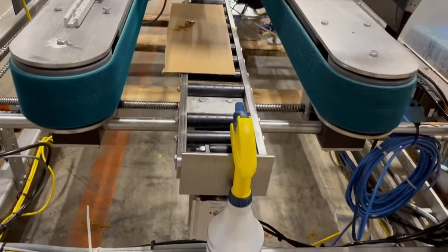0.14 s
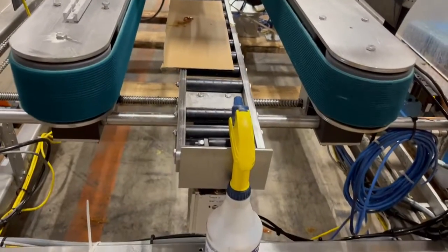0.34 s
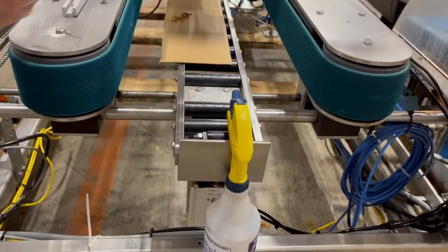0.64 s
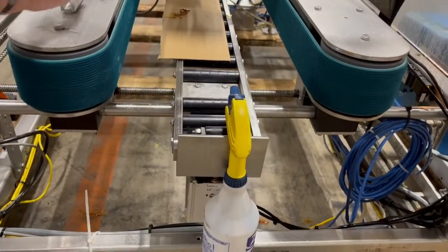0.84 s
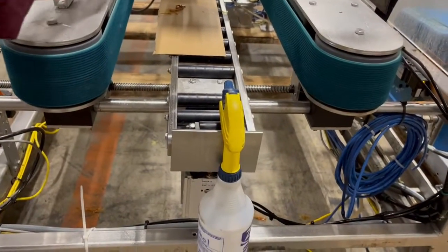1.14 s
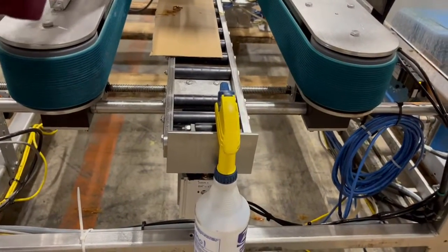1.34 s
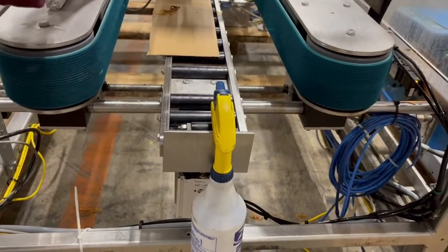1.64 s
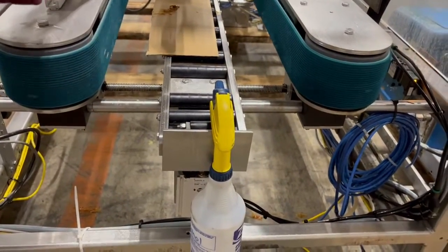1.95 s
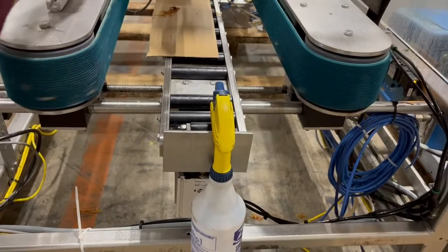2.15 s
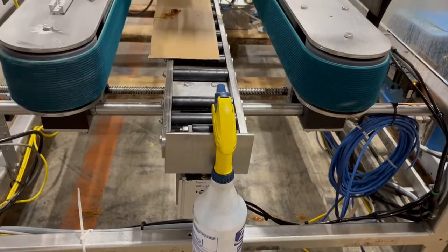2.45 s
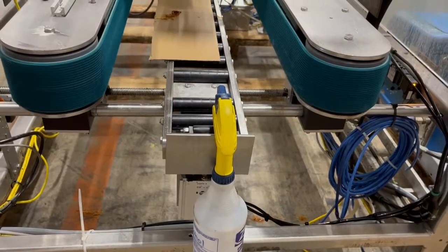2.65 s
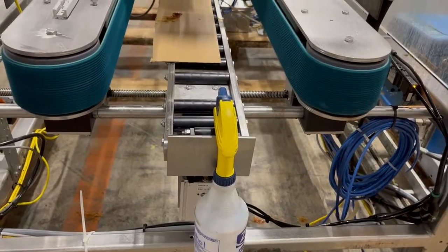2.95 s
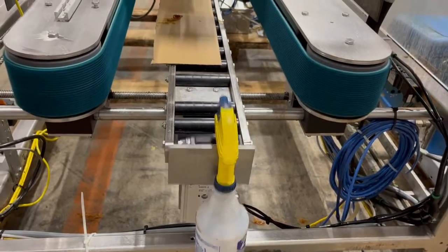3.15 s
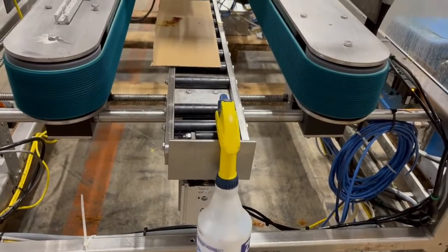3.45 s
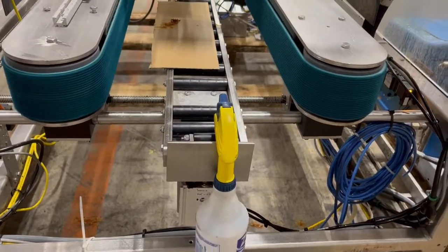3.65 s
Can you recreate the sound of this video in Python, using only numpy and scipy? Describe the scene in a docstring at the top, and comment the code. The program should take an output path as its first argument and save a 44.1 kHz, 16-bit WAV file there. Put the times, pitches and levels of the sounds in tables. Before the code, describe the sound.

A case sealer runs empty up close, with a steady belt whir, fast low throb, wavering gear hum and thin air hiss over factory rumble. The hum swells near 1.1 s. At 1.6 s small clacks and an air burst begin a juddering, scraping metallic rattle, strongest until 2.2 s, thinning to 2.8 s. From 3.1 to 3.4 s, air puffs and sharp steel clacks; then the whir continues, with a faint tick near 3.6 s.

```python
"""A case sealer runs empty in a factory, close by: shaft throb, gear tones, belt noise ringing bearings, a leak's hiss.
The main gear hum, a wavering sine, swells near 1.1 s; from 1.6 s two small clacks and bursts of exhaust noise.
The side-belt carriage then judders (a gliding tone), scrapes and rattles (noise bursts ringing frame modes).
Past 3 s more air flows and steel parts clack home: sagging thuds, struck modes and bright noise.
Low rumble lies under it all; a short diffuse tail follows the hits."""
import sys
import numpy as np
from scipy import signal
from scipy.fft import rfft, irfft
from scipy.io import wavfile
from scipy.ndimage import uniform_filter1d

SR = 44100
rng = np.random.default_rng(int(sys.argv[2]) if len(sys.argv) > 2 else 0)


def bounce(signal):
    """Save signal as a 16-bit WAV file at the path given by the first command-line argument."""
    frames = np.transpose(np.atleast_2d(signal))
    limited = np.clip(frames, -1, 1)
    pcm = np.round(limited * 32767).astype(np.int16)
    wavfile.write(sys.argv[1], SR, pcm)


N = 166698
T = np.arange(N) / SR
FREQS = np.arange(N // 2 + 1) * SR / N


def undb(db):
    """Decibels to gain."""
    return 10 ** (np.asarray(db) / 20)


def unit(x):
    """Scale to rms 1."""
    return x / np.sqrt(np.mean(x ** 2))


def over_hz(points):
    """Join (frequency [Hz], value) points on a log-frequency axis."""
    hz, value = np.array(points).T
    return np.interp(np.log(FREQS + 1), np.log(hz), value)


def over_time(points):
    """Join (time [s], value) points linearly."""
    time_s, value = np.array(points).T
    return np.interp(T, time_s, value)


def walk(rate_hz):
    """Smooth random wander of rms 1: noise under a Gaussian low-pass."""
    spectrum = rfft(rng.standard_normal(N))
    return unit(irfft(spectrum * np.exp(-(FREQS / rate_hz) ** 2), N))


def envelope(start_s, attack_s, hold_s, decay_s):
    """Linear rise, hold, exponential fall with time constant decay_s."""
    age = T - start_s
    fall = np.exp(-np.clip((age - attack_s - hold_s) / decay_s, 0, 20))
    return np.clip(age / attack_s, 0, 1) * fall


def tone(hz):
    """A sine of rms 1 that follows a pitch curve from a random phase."""
    cycles = np.cumsum(hz) / SR + rng.random()
    return np.sqrt(2) * np.sin(2 * np.pi * cycles)


RIPPLE_WIDTH_HZ = 34.7


def ripple(db):
    """Fine peaks and dips that reflections off nearby steel leave in a spectrum."""
    size = max(int(RIPPLE_WIDTH_HZ * N / SR), 1)
    smooth = uniform_filter1d(rng.standard_normal(len(FREQS)), size)
    return undb(db * unit(uniform_filter1d(smooth, size)))


# likeness of noise at the two ports: (frequency [Hz], likeness [0-1])
PORT_LIKENESS = [(60, 0.5), (130, 1), (290, 0.55), (640, 0.63), (1400, 0.27), (3100, 0.69), (6000, 0.05),
                 (7200, 0.8), (8000, 1), (10000, 1), (15000, 1)]


def noise(spectrum, ripple_db=0):
    """Coloured noise of rms 1 at two ports: a shared part plus an opposed part."""
    mid, side = rfft(rng.standard_normal((2, N)))
    alike = np.clip(over_hz(PORT_LIKENESS), 0, 1)
    shared = mid * np.sqrt(1 + alike)
    opposed = np.array([[1], [-1]]) * side * np.sqrt(1 - alike)
    return unit(irfft((shared + opposed) * undb(over_hz(spectrum)) * ripple(ripple_db), N))


def damped_modes(modes, t, pitch=1):
    """Sum of decaying sines, as steel rings after one impulse."""
    return sum(undb(db - 60 * t / t60_s) * np.sin(2 * np.pi * hz * pitch * t)
               for hz, db, t60_s in modes)


def ring(x, modes, db):
    """Steel modes driven by x, at a level db relative to it."""
    response = damped_modes(modes, T[:SR // 2])
    ringing = signal.fftconvolve(x, response[None], axes=1)[:, :N]
    return unit(ringing) * x.std() * undb(db)


SHAFT_HZ, SHAFT_WANDER_RATIO = 19.33, 0.0023
SHAFT_DB, SHAFT_FLICKER_DB = -39.5, 1.56
SHAFT_BEAT_S, SHAFT_SMEAR_RAD = 0.032, 1.15
# shaft harmonics: (multiple of shaft rate, relative level [dB])
SHAFT_HARMONICS = [(3, -0.5), (4, -2), (5, -13.5), (6, -1.5), (7, -2.5), (8, -11), (9, -12.5), (10, -5.5),
                   (11, -15), (16, -24), (20, -16)]


def shaft(turn):
    """Shaft harmonics, loosely aligned in phase, throb once a turn."""
    throb = 0
    for k, db in SHAFT_HARMONICS:
        level = undb(db + SHAFT_FLICKER_DB * walk(3.2))
        throb = throb + level * np.cos(k * turn + SHAFT_SMEAR_RAD * rng.standard_normal())
    return undb(SHAFT_DB) * unit(throb)


GEAR_WANDER_RATIO, GEAR_FLICKER_DB = 0.007, 3
# motor, gear and roller tones: (frequency [Hz], level [dB])
GEAR_TONES = [(61.7, -50.5), (305, -62), (415, -60.5), (504, -61.5), (533, -63.5), (592, -57.5), (652, -66),
              (711, -60.5), (1160, -62), (1244, -53)]


def gears():
    """Motor, gears and rollers hum as sines wavering in pitch and level."""
    return sum(undb(db + GEAR_FLICKER_DB * walk(6.8)) * tone(hz * (1 + GEAR_WANDER_RATIO * walk(26.8)))
               for hz, db in GEAR_TONES)


MESH_HZ, MESH_WANDER_RATIO, MESH_FLICKER_DB = 360.5, 0.0122, 3.5
# main gear hum: (time [s], level [dB])
MESH_LEVEL = [(0, -51), (.25, -47.5), (.42, -52.5), (.65, -52.5), (.92, -53), (1.08, -42.5), (1.25, -53.5),
              (2, -52), (2.2, -59), (2.4, -50.5), (3, -52.5), (3.75, -53.5)]


def mesh():
    """The main gear hum: one wavering sine that swells and fades."""
    level = undb(over_time(MESH_LEVEL) + MESH_FLICKER_DB * walk(15))
    return level * tone(MESH_HZ * (1 + MESH_WANDER_RATIO * walk(26.4)))


STEADY_RIPPLE_DB = 2
WHIR_DB, WHIR_THROB_RATIO, WHIR_FLICKER_DB, BEARING_DB = -39.5, 0.034, 0.62, -12
# belt noise: (frequency [Hz], relative density [dB])
WHIR_SPECTRUM = [(25, -10), (50, -19), (100, 7.5), (240, -3.5), (400, 0), (850, -3.5), (1220, 1.5),
                 (1600, 0.5), (1900, -7.5), (3000, -8), (3500, -4), (4200, -6.5), (5600, -7.5), (8000, -27),
                 (15000, -16.5)]
# bearing resonances: (frequency [Hz], relative level [dB], t60 [s])
BEARING_MODES = [(1157, 10.5, 0.049), (1280, 7.5, 0.045), (1435, 5, 0.047), (1720, 7, .03),
                 (3200, -15, .08), (3670, 5, .035), (3790, 10, .04), (4167, -8, .06), (4312, -4, .06),
                 (6110, 19, 0.13), (7117, -7, .04)]


def belts(turn):
    """Belt noise pulses slightly with the shaft and rings the bearings."""
    throb = 1 + WHIR_THROB_RATIO * np.cos(turn)
    whir = noise(WHIR_SPECTRUM, STEADY_RIPPLE_DB) * throb * undb(WHIR_FLICKER_DB * walk(32))
    return undb(WHIR_DB) * (whir + ring(whir, BEARING_MODES, BEARING_DB))


def drive():
    """One wandering shaft angle paces throb and belts; the gears hum alongside."""
    shaft_hz = SHAFT_HZ * (1 + SHAFT_WANDER_RATIO * walk(3.2))
    turn = 2 * np.pi * (np.cumsum(shaft_hz) / SR - SHAFT_HZ * SHAFT_BEAT_S)
    return shaft(turn) + gears() + mesh() + belts(turn)


HIT_RIPPLE_DB = 2
JUDDER_WANDER_RATIO, SCRAPE_GRAIN_DB = 0.07, 5.5
# sliding carriage: (time [s], judder pitch [Hz], judder level [dB], scrape level [dB])
CARRIAGE_SLIDE = [(1.66, 130, -75, -69), (1.68, 120, -28.5, -30), (1.71, 127.1, -43.5, -44),
                  (1.86, 168.2, -48, -36), (1.912, 149.9, -28.5, -28.5), (1.965, 132.1, -32.5, -31.5),
                  (2.02, 119.4, -48, -37), (2.095, 106.3, -28.5, -34), (2.14, 110.2, -46, -38.5),
                  (2.22, 129.8, -40, -45.5), (2.33, 105, -55, -58), (2.66, 120, -58, -45),
                  (2.92, 120, -65, -54)]
# dull scrape: (frequency [Hz], relative density [dB])
SCRAPE_SPECTRUM = [(50, -23), (200, 5.5), (330, -4), (650, -2), (1100, 1), (1900, 0), (3500, -6),
                   (6000, -7), (15000, -30)]


def slide():
    """Judder as a gliding sine, scrape as grainy dull noise."""
    s, hz, judder_db, scrape_db = np.array(CARRIAGE_SLIDE).T
    moving = (T > s[0]) & (T < s[-1])
    judder_hz = np.interp(T, s, hz) * (1 + JUDDER_WANDER_RATIO * walk(69.0))
    judder = moving * undb(np.interp(T, s, judder_db)) * tone(judder_hz)
    grain = unit(undb(SCRAPE_GRAIN_DB * walk(300)))
    scrape = moving * undb(np.interp(T, s, scrape_db)) * grain * noise(SCRAPE_SPECTRUM, HIT_RIPPLE_DB)
    return judder, scrape


RATTLE_ATTACK_S, RATTLE_HOLD_S, RATTLE_DECAY_S, RATTLE_GRAIN_DB = 0.0064, 0.003, 0.0087, 2.5
CONTACT_RATE_HZ, CONTACT_RIPPLE_DB = 14.5, 3.5
# rattle bursts: (time [s], level [dB])
RATTLE_BURSTS = [(1.62, -36.5), (1.689, -18), (1.814, -19.5), (1.875, -16), (1.909, -20), (1.936, -20),
                 (1.961, -23.5), (1.992, -20.5), (2.019, -25.5), (2.053, -31.5), (2.09, -28), (2.125, -33),
                 (2.173, -27.5), (2.231, -25.5), (2.418, -30.5), (2.499, -35.5), (2.641, -27),
                 (2.704, -29.5), (2.75, -30), (2.83, -31.5), (3.085, -31)]
# rattle colour: (frequency [Hz], relative density [dB])
CLATTER_SPECTRUM = [(40, -30), (100, -11), (230, 1.5), (330, -10.5), (650, -3.5), (1000, 2), (1300, 1.5),
                    (2100, 0), (3800, -0.5), (5500, -1.5), (7500, -11), (11000, -14), (15500, -21)]


def rattle():
    """Bright bursts of tiny collisions; the colour wanders with the point of contact."""
    force = sum(undb(db) * envelope(s, RATTLE_ATTACK_S, RATTLE_HOLD_S, RATTLE_DECAY_S)
                for s, db in RATTLE_BURSTS)
    contact = walk(CONTACT_RATE_HZ)
    colour = np.cos(contact) * noise(CLATTER_SPECTRUM, CONTACT_RIPPLE_DB)
    colour = colour + np.sin(contact) * noise(CLATTER_SPECTRUM, CONTACT_RIPPLE_DB)
    return force * unit(undb(RATTLE_GRAIN_DB * walk(840))) * colour


FRAME_DB, FRAME_WARP_S = -7.5, 0.00022
# frame modes: (frequency [Hz], relative level [dB], t60 [s])
FRAME_MODES = [(236, -1, 0.08), (462, 1, 0.2), (608, 2, 0.11), (684, 3.5, 0.083), (867, 0.5, 0.13),
               (1016, 3, .13), (1290, 3, 0.1), (1366, 3, .09), (1484, 1, 0.12), (1733, 3, 0.14),
               (1794, 4.5, .12), (2410, -1, .05), (2906, 3, 0.08), (3730, 4, 0.06), (4300, -4, .06),
               (4834, -3, 0.13)]


def carriage():
    """Scrape and rattle ring the frame, wavering as the carriage shifts its load; judder adds."""
    judder, scrape = slide()
    clatter = scrape + rattle()
    warped = T + FRAME_WARP_S * walk(12.4)
    ringing = [np.interp(warped, T, port) for port in ring(clatter, FRAME_MODES, FRAME_DB)]
    return clatter + np.array(ringing) + judder


CLACK_ATTACK_S, CLACK_HOLD_S = 0.00093, 0.0036
# struck stop, before the pitch ratio: (frequency [Hz], relative level [dB], t60 [s])
STOP_MODES = [(680, -14.5, 0.11), (1043, -1, .04), (1335, -0.5, .032), (1755, -14, .05)]


def struck(start_s, pitch):
    """The stop's few short modes after one blow; their pitch depends on where it lands."""
    t = T[:SR // 5]
    blow = damped_modes(STOP_MODES, t, pitch) * np.clip(t / CLACK_ATTACK_S, 0, 1)
    return np.interp(T - start_s, t, blow, left=0, right=0)


THUD_START_HZ, THUD_END_HZ, THUD_SAG_S = 500, 228, 0.0028
THUD_LAG_S, THUD_ATTACK_S, THUD_DECAY_S, THUD_NOISE_DB = 0.0018, 0.0025, 0.0074, -7
# noise in the thud: (frequency [Hz], relative density [dB])
THUD_SPECTRUM = [(50, -36), (120, 11), (250, -2), (500, -6), (700, 5.5), (1000, -7), (2500, -31)]


def panel_thud(start_s, flutter):
    """A late panel thud: a sine sagging in pitch, plus low noise."""
    sag = envelope(start_s, CLACK_ATTACK_S, THUD_LAG_S, THUD_SAG_S)
    sine = tone(THUD_END_HZ + (THUD_START_HZ - THUD_END_HZ) * sag)
    swell = envelope(start_s + THUD_LAG_S, THUD_ATTACK_S, CLACK_HOLD_S, THUD_DECAY_S)
    return unit(sine + undb(THUD_NOISE_DB) * flutter) * swell


KNOCK_DECAY_S, CRACK_DECAY_S = 0.0055, 0.0045
STOP_NOISE_DB, CHATTER_DB, BRACKET_DB = -7.5, 1.5, -13
# clacks: (time [s], thud [dB], knock [dB], crack [dB], ping [dB], steel lag [s], knock pitch [ratio])
CLACK_EVENTS = [(1.626, -38, -32.5, -43, -53, 0.0023, 1.1), (1.672, -29.5, -32.5, -48, -37, 0.0043, .8),
                (3.08, -32, -40, -35.5, -35, 0.0084, 1), (3.1427, -36.5, -33, -23.5, -29, 0.0025, 1),
                (3.1739, -33, -9, -25, -15.5, 0.00016, 1), (3.182, -40, -22, -32, -24, 0.0018, .58),
                (3.189, -38, -26, -24.5, -37, 0.00092, .52), (3.221, -43, -43, -35, -33, 0.00056, 1),
                (3.245, -44, -30, -30, -22.5, 0, 1.1), (3.262, -19.5, -19.5, -22.5, -28, 0.001, .93),
                (3.3174, -35, -16.5, -25.5, -17, 0.0032, .99), (3.324, -38, -26, -38, -29, 0.011, .58),
                (3.344, -40, -44, -31, -39, 0.0039, 1), (3.38, -39, -19, -17.5, -18.5, 0.0023, .89),
                (3.385, -24.5, -26.5, -35, -33, 0.001, 1.05), (3.632, -37.5, -34.5, -46, -52, 0.0019, 1)]
# noise in knock, steel crack and steel ping: (frequency [Hz], relative density [dB])
KNOCK_SPECTRUM = [(250, -27), (520, -7), (680, -6), (800, -8), (1030, 1), (1330, 0), (1600, -14),
                  (2000, -20), (5000, -29)]
CRACK_SPECTRUM = [(900, -11), (1900, -1.5), (2400, -3), (2750, -13.5), (3200, -1), (4300, -4), (5200, -16),
                  (8000, -9.5), (15500, -18)]
PING_SPECTRUM = [(2500, -19), (4600, -2.5), (5700, 4), (6400, -5.5), (6850, 5.5), (7500, -0.5),
                 (12000, -13), (15500, -9)]
# stop bracket modes: (frequency [Hz], relative level [dB], t60 [s])
BRACKET_MODES = [(245, -10, .1), (520, -10, 0.09), (674, -22, .12), (950, -24, .07), (1000, -17, 0.07),
                 (1300, -24, .05), (1620, -15, 0.11), (2450, 4, 0.095), (3120, -2, 0.19), (3620, 2, 0.066),
                 (5080, -5, .08), (5600, -3, 0.092), (6120, 5, 0.065), (6870, 9.5, 0.049)]


def stops():
    """Each clack sums knock, steel crack and ping, and late thud; all ring the bracket."""
    spectra = (THUD_SPECTRUM, KNOCK_SPECTRUM, CRACK_SPECTRUM, PING_SPECTRUM)
    flutter, knock_noise, crack, ping = (noise(spectrum, HIT_RIPPLE_DB) for spectrum in spectra)
    crack = crack * unit(undb(CHATTER_DB * walk(400)))  # steel chatters within each clack
    out = 0
    for s, thud_db, knock_db, crack_db, ping_db, lag_s, pitch in CLACK_EVENTS:
        knock_fade = envelope(s, CLACK_ATTACK_S, CLACK_HOLD_S, KNOCK_DECAY_S)
        knock = struck(s, pitch) + undb(STOP_NOISE_DB) * knock_noise * knock_fade
        steel = crack * undb(crack_db) + ping * undb(ping_db)
        steel = steel * envelope(s + lag_s, CLACK_ATTACK_S, CLACK_HOLD_S, CRACK_DECAY_S)
        out = out + undb(thud_db) * panel_thud(s, flutter) + undb(knock_db) * knock + steel
    return out + ring(out, BRACKET_MODES, BRACKET_DB)


VENT_ATTACK_S = 0.0026
# air vents: (start [s], hold [s], level [dB], release time constant [s])
VENT_EVENTS = [(1.674, 0.013, -33.5, 0.013), (1.675, 0.18, -26.5, 0.021), (2.168, 0.51, -35, 0.068),
               (3.072, 0.1, -33.5, .015), (3.234, .125, -35, .02)]
# exhaust: (frequency [Hz], relative density [dB])
EXHAUST_SPECTRUM = [(200, -17), (1500, -11), (4000, -3), (7000, -2.5), (8500, 1.5), (10500, 3),
                    (13000, 2.5), (15500, -8)]


def vents():
    """Exhaust while a cylinder moves: enveloped turbulent noise."""
    flow = sum(undb(db) * envelope(s, VENT_ATTACK_S, hold_s, release_s)
               for s, hold_s, db, release_s in VENT_EVENTS)
    return flow * noise(EXHAUST_SPECTRUM, STEADY_RIPPLE_DB)


LEAK_DB = -36.5
# air leak: (frequency [Hz], relative density [dB])
LEAK_SPECTRUM = [(2000, -12), (5500, -14.5), (7100, 0.5), (7800, -4), (10300, -2.5), (13000, -5),
                 (15500, -13)]


def leak():
    """A steady compressed-air leak: treble noise."""
    return undb(LEAK_DB) * noise(LEAK_SPECTRUM, STEADY_RIPPLE_DB)


HALL_T60_S, HALL_DB, HALL_TREBLE_HZ, HALL_BUILD_S = 0.38, -11.5, 4400, 0.0042


def hall(x):
    """Diffuse, duller reflections from machine and factory: convolution with decaying noise."""
    fade = envelope(0, HALL_BUILD_S, 0, HALL_T60_S / np.log(1000))
    tail = noise([(60, -6), (400, 0), (HALL_TREBLE_HZ, -3), (12000, -14)]) * fade
    tail = tail / np.sqrt(np.sum(tail ** 2) / 2)
    return undb(HALL_DB) * signal.fftconvolve(x, tail, axes=1)[:, :N]


RUMBLE_DB = -50.5
# factory rumble: (frequency [Hz], relative density [dB])
RUMBLE_SPECTRUM = [(25, -34), (46, -25), (58, -2), (68, 8), (85, -21), (200, -35)]


def rumble():
    """The factory's low rumble: steady bass noise."""
    return undb(RUMBLE_DB) * noise(RUMBLE_SPECTRUM)


PORT_HZ = 200  # the ports differ in level only above about this


def place(x, balance):
    """Tilt the level between left and right above the bass."""
    tilt_db = over_hz(balance) * FREQS / (FREQS + PORT_HZ)
    return irfft(rfft(x) * undb(np.array([[.5], [-.5]]) * tilt_db), N)


# left over right, before the bass fade, for steady sounds and for hits: (frequency [Hz], level [dB])
STEADY_TILT = [(100, 4), (700, 2), (1500, 1), (2300, 1), (4400, 4), (7000, 1.5), (8200, -0.5), (15000, 0)]
HIT_TILT = [(100, -3), (700, 4), (2300, 0.5), (4400, 6.5), (7000, 5.5), (8200, -2), (15000, 1)]


def scene():
    """The running machine, with its direct hits mostly a little to the left."""
    hits = carriage() + stops()
    steady = drive() + vents() + leak() + hall(hits) + rumble()
    return place(steady, STEADY_TILT) + place(hits, HIT_TILT)


TOP_HZ = 15750
# phase lead of left over right, negative for lag: (frequency [Hz], phase [rad])
PORT_LEAD = [(300, 0), (1120, 0), (1640, -.8), (2330, 0), (3450, .7), (5000, .6), (5680, -1.1),
             (6600, -1.2), (7700, -2.9), (9100, -3.35), (10000, -4.7), (11100, -6.2), (12900, -6.4),
             (13500, -7.2), (14400, -9.0), (15300, -9.4)]


def record(dry):
    """Two spaced ports hear the treble out of step; a steep low-pass cuts the top."""
    shift = np.exp(1j * np.array([[.5], [-.5]]) * over_hz(PORT_LEAD))
    ports = irfft(rfft(dry) * shift, N)
    return signal.sosfilt(signal.ellip(10, .2, 80, TOP_HZ, fs=SR, output="sos"), ports)


dry = scene()
out = record(dry)
bounce(out)
```